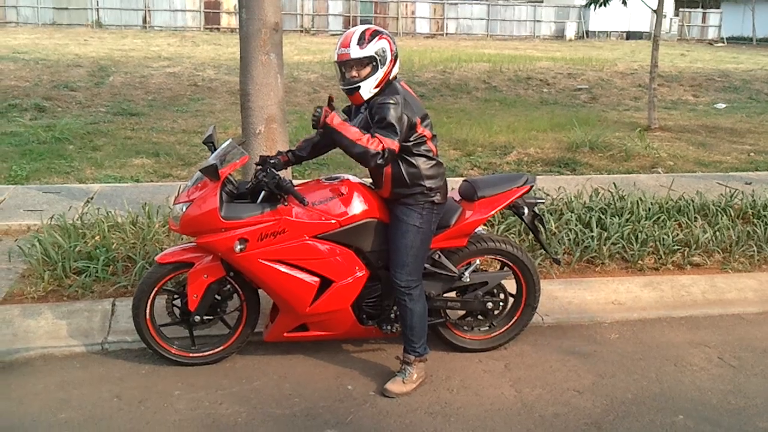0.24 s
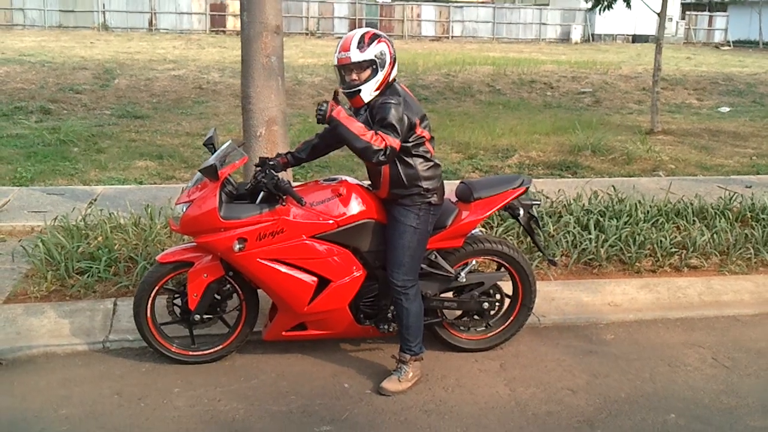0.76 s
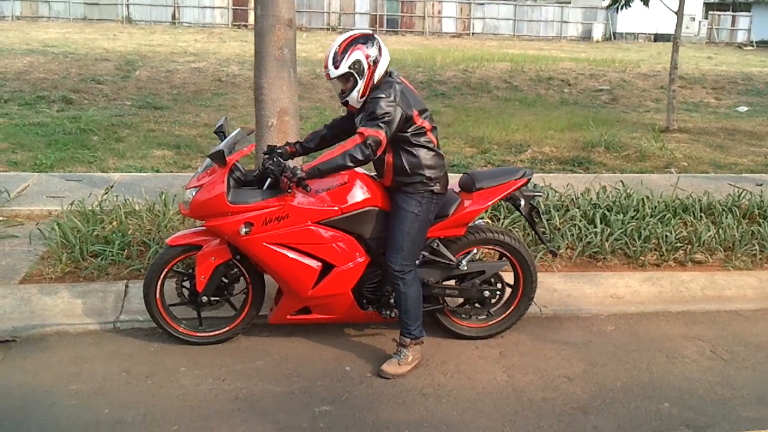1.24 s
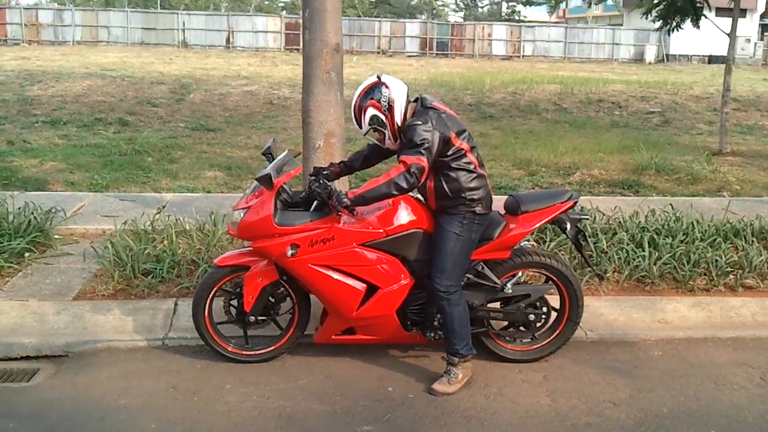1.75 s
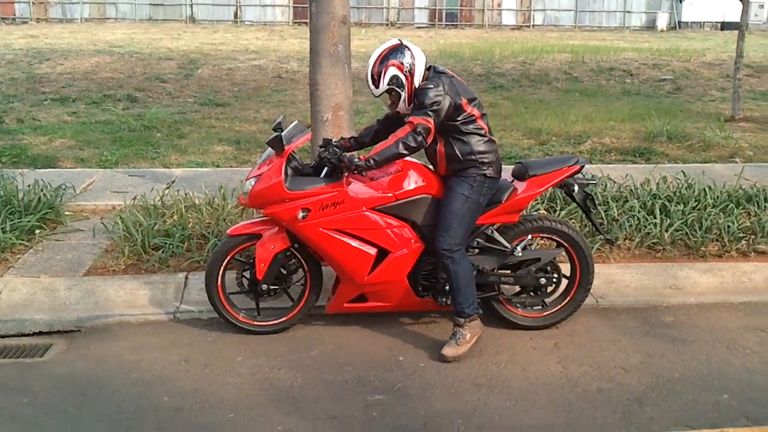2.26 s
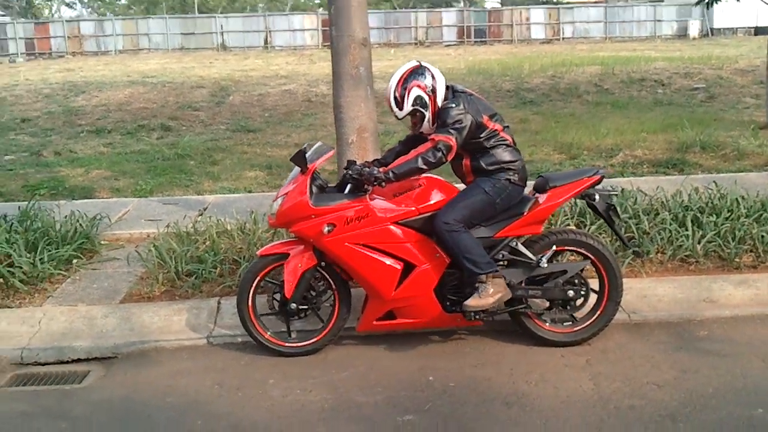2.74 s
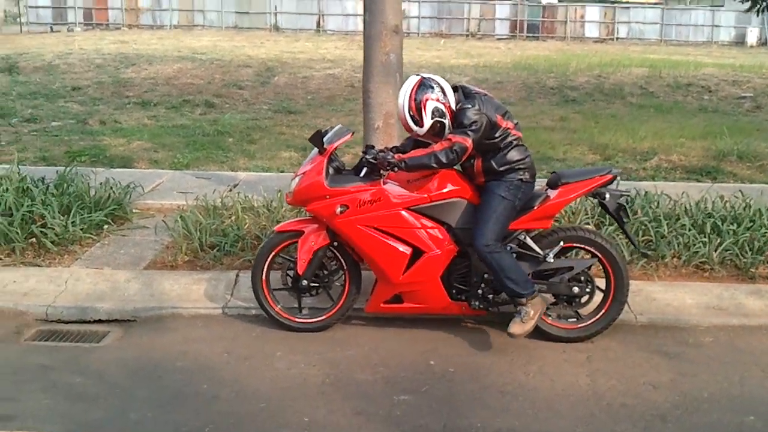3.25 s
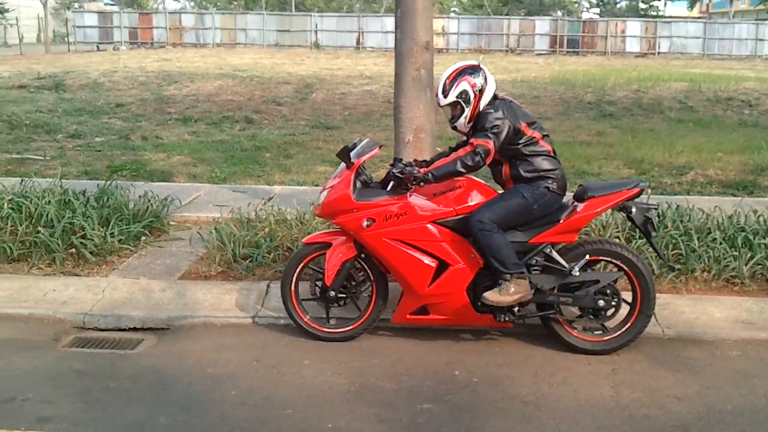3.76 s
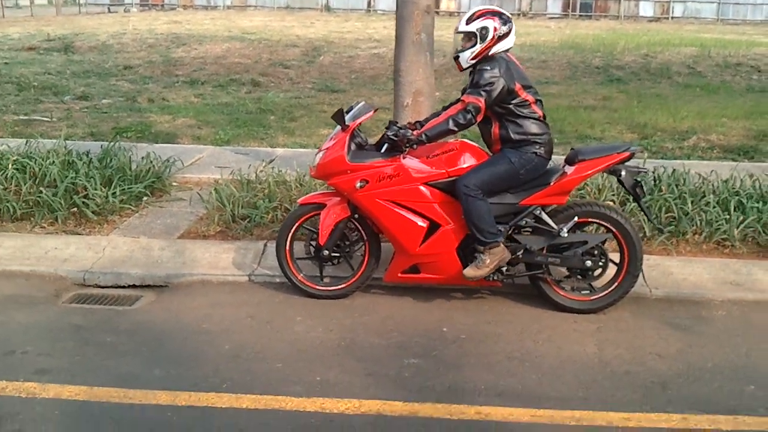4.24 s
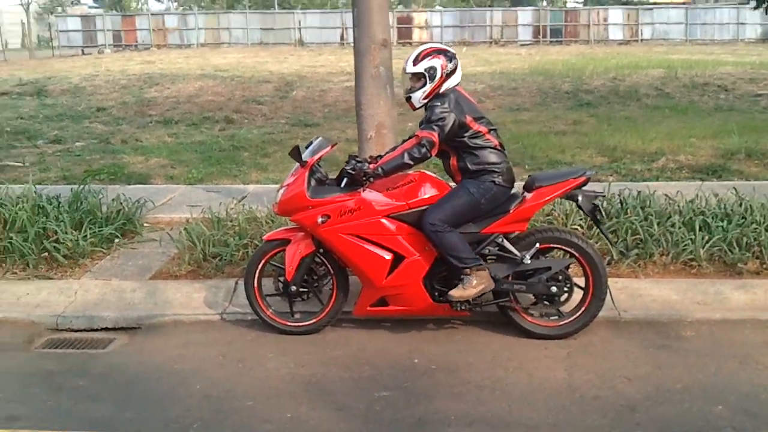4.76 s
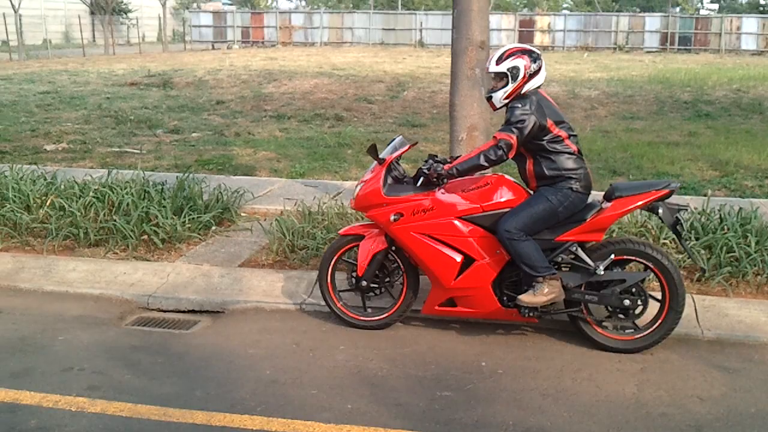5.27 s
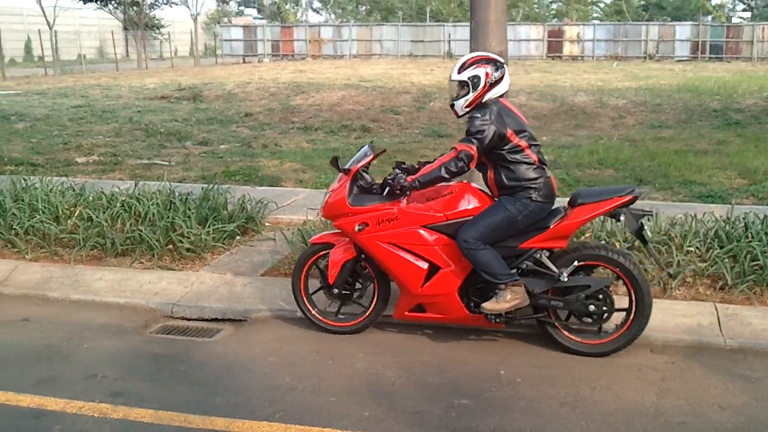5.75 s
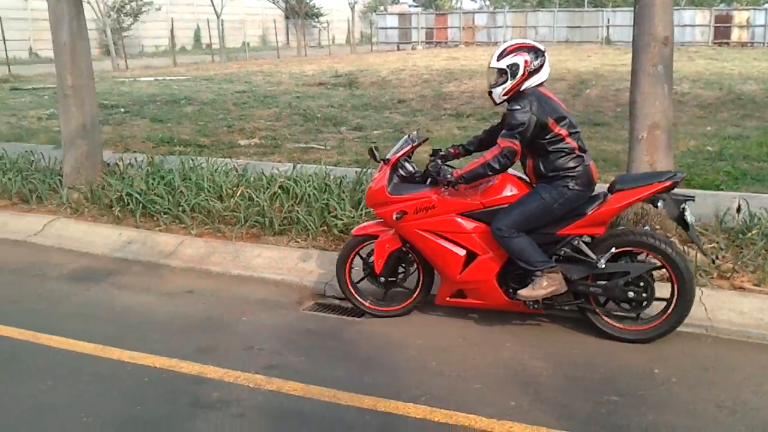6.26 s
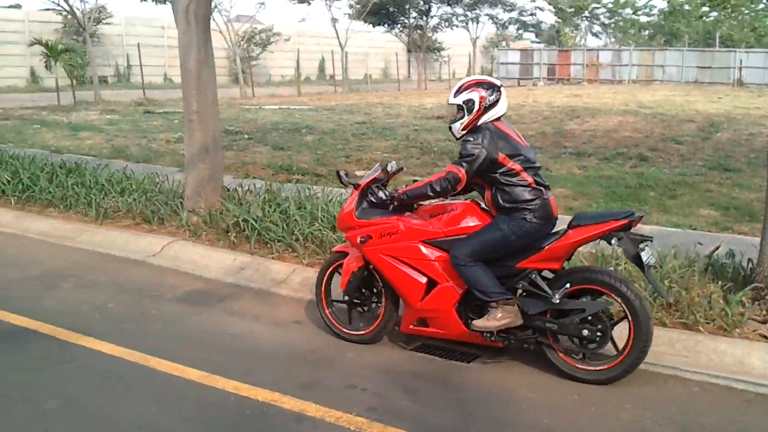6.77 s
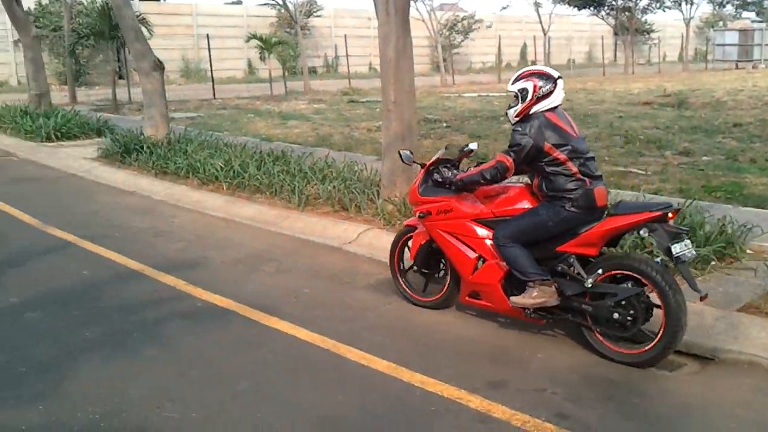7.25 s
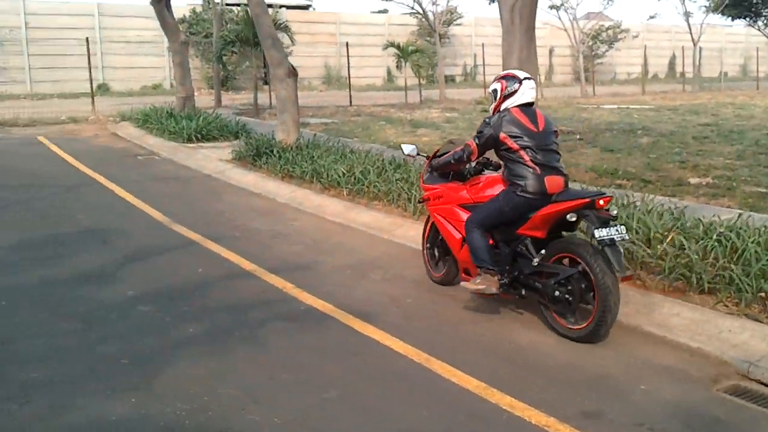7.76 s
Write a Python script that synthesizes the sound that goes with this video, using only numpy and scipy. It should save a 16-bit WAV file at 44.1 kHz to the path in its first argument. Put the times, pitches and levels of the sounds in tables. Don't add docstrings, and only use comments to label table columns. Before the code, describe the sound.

Motorbike idling at the kerb, revved three times with bright lever clicks, then gear whine and rising engine drone as it rides off in gusts.

```python
import sys
import numpy as np
from scipy import signal
from scipy.fft import rfft, irfft
from scipy.io import wavfile
from scipy.ndimage import uniform_filter1d

SR = 44100
rng = np.random.default_rng(int(sys.argv[2]) if len(sys.argv) > 2 else 0)


def rack_gain(trim_db):
    fader = np.asarray(trim_db, float)
    return 10 ** (fader / 20)


def bounce(signal):
    frames = np.transpose(np.atleast_2d(signal))
    limited = np.clip(frames, -1, 1)
    pcm = np.round(limited * 32767).astype(np.int16)
    wavfile.write(sys.argv[1], SR, pcm)


N = 353241
TIME = np.arange(N) / SR


def rms_one(x):
    return x / np.sqrt(np.mean(x ** 2) + 1e-20)


def in_time(rows):
    return np.interp(TIME, *np.transpose(rows))


def high_pass(order, hz):
    return signal.butter(order, hz, "high", fs=SR, output="sos")


def band(x, low_hz, high_hz):
    return signal.sosfilt(signal.butter(2, [low_hz, high_hz], "band", fs=SR, output="sos"), x)


def resonance(x, hz, width_hz):
    r = np.exp(-np.pi * width_hz / SR)
    poles = [1, -2 * r * np.cos(2 * np.pi * hz / SR), r * r]
    return signal.lfilter([(1 - r * r) / 2, 0, (r * r - 1) / 2], poles, x + 1e-18)


def body(x, modes):
    return sum(rack_gain(db) * resonance(x, hz, width_hz) for hz, width_hz, db in modes)


def coloured(x, points):
    hz, db = np.transpose(points)
    grid_hz = np.arange(N // 2 + 1) * SR / N + 1
    gain_db = np.interp(np.log(grid_hz), np.log(hz), db)
    return rms_one(irfft(rfft(x) * rack_gain(gain_db), N))


def drift(rate_hz):
    r = np.exp(-2 * np.pi * rate_hz / SR)
    wander = signal.lfilter([1], [1, -2 * r, r * r], rng.standard_normal(N + SR))
    return rms_one(wander[SR:])


def levelled(x, window_s):
    power = uniform_filter1d(x ** 2, int(window_s * SR), mode="reflect")
    return x / np.sqrt(power + 1e-12)


def crank_speed():
    # time in seconds, speed in cycles per second before the rounding.
    speed_points = [(0.0, 9.28), (1.63, 9.11), (2.05, 27.41), (2.44, 20.67), (2.56, 27.35), (2.8, 25.41),
                    (3.44, 9.42), (3.94, 15.51), (4.17, 27.47), (4.76, 11.23), (4.98, 19.17), (5.38, 30.21),
                    (6.05, 25.42), (6.78, 24.25), (7.16, 28.76), (7.3, 29.93), (7.71, 21.13), (8.01, 20.87)]
    flywheel = int(.125 * SR)
    once = uniform_filter1d(in_time(speed_points), flywheel, mode="nearest")
    return uniform_filter1d(once, flywheel, mode="nearest")


def throttle():
    # opens in seconds, shuts in seconds, opening 0-1, time to open in seconds.
    twists = [
        (1.614, 2.023, 0.99, .12),
        (2.416, 2.59, 0.79, 0.014),
        (3.67, 3.84, 0, .06),
        (3.832, 4.125, 0.94, 0.067),
        (4.778, 5.047, 0.74, 0.069),
        (5.107, 7.357, 0.68, 0.093),
        (7.748, 8.2, 0.49, .08),
    ]
    shut_s = .1
    openings = []
    for opens, shuts, share, rise_s in twists:
        opened = 1 - np.exp(-np.maximum(TIME - opens, 0) / rise_s)
        openings.append(share * opened * np.exp(-np.maximum(TIME - shuts, 0) / shut_s))
    return np.max(openings, axis=0)


def in_gear():
    return np.clip((TIME - 5.2) * 8, 0, 1)


def firings(cycles, scatter_db, second_db):
    kicks = np.zeros(N)
    for lag_cycles, level_db in ((0, 0), (.243, second_db)):
        at = np.flatnonzero(np.diff(np.floor(cycles - lag_cycles)) > 0)
        kicks[at] = rack_gain(level_db + scatter_db * rng.standard_normal(len(at)))
    return kicks


def puffs(kicks, decay_s):
    envelope = signal.lfilter([1], [1, -np.exp(-1 / (decay_s * SR))], kicks)
    return envelope * rng.standard_normal(N)


def doublets(kicks, width_s):
    t = np.arange(-400, 401) / SR / width_s - .6
    pulse = (t - .55 * (1 - t ** 2)) * np.exp(-t ** 2 / 2)
    return signal.fftconvolve(kicks, pulse, "same")


def exhaust(cycles, speed):
    # chamber resonance in Hz, width in Hz, level in dB.
    silencer = [(75, 22, 1), (105, 30, -3), (152, 28, 0), (225, 40, -8), (320, 80, -9), (425, 60, -3)]
    loaded = in_gear()
    kicks = firings(cycles, scatter_db=1.8, second_db=2.0)
    clean = levelled(body(doublets(kicks, width_s=.0013), silencer), .3)
    turbulence = band(band(puffs(kicks, .12), 55, 500), 45, 560)
    blur = levelled(body(turbulence, silencer), .3)
    blur_share = np.interp(speed, [10, 18], [1, .8]) * (1 - .6 * loaded)
    gas = (clean + blur_share * blur) / np.sqrt(1 + blur_share ** 2)
    thin = band(gas, 85, 600)
    return (1 - loaded) * gas + rack_gain(-21) * loaded * thin


def casing(cycles):
    # cover resonance in Hz, width in Hz, level in dB.
    neutral_modes = [(872, 205, 4), (1344, 89, 0.5), (1613, 170, 1)]
    loaded_modes = [(995, 150, 3), (835, 260, 1.5), (1574, 460, -10)]
    knock = puffs(firings(cycles + .03, scatter_db=1.5, second_db=-3.0), .015)
    oil = .4 * rng.standard_normal(N)
    shaken = band(knock + oil, 872, 1650)
    loaded = in_gear()
    return levelled((1 - loaded) * body(shaken, neutral_modes) + loaded * body(shaken, loaded_modes), 0.48)


def clatter(cycles, speed):
    # frequency in Hz, level in dB per Hz.
    idle_spectrum = [(1060, -36), (1800, -21.5), (1930, -26), (2200, -14), (2600, -15), (2920, -6.5),
                     (3180, -11), (3740, -8), (3940, -12), (4320, -4.5), (4860, -11), (5610, -11),
                     (7430, -15), (7930, -8), (8580, -4), (11200, -66), (18900, -120)]
    fast_spectrum = [(1060, -18.5), (1800, -15), (2000, -21), (2370, -15), (2920, -12), (3180, -13.5),
                     (3820, -10.5), (4210, -4.5), (4550, -3), (5050, -10.5), (5760, -4.5), (6780, -11.5),
                     (7290, -9.5), (7980, -7), (8580, 1), (11200, -67.5), (18900, -120)]
    # share of the cycle after the first firing, swell in dB.
    valve_timing = [(0, -6), (.18, 1.5), (.27, -2), (.42, -3), (.53, -3.5), (.7, -2.5), (.85, -1), (1, 3.5)]
    sizes = rack_gain(0.83 * np.minimum(rng.exponential(1, N), 4)) * rng.choice([-1, 1], N)
    ticks = rms_one(sizes * (rng.random(N) < 120 * speed / SR))
    contacts = levelled(ticks, 0.024) + 1.53 * rng.standard_normal(N)
    fast = np.clip((speed - 10) / 5.4, 0, 1)
    timing_db = np.interp(cycles % 1, *np.transpose(valve_timing)) * (1 - 0.38 * fast)
    tone = (1 - fast) * coloured(contacts, idle_spectrum) + fast * coloured(contacts, fast_spectrum)
    return tone * rack_gain(timing_db + 0.76 * drift(37))


def shaded(x):
    held = np.clip(np.minimum(TIME - 3.17, 4.52 - TIME) * 5, 0, 1)
    shadow = np.clip((TIME - 4.9) * 0.14, 0, .8)
    x = x + 0.31 * in_gear() * resonance(x, 4400, 550)
    return rack_gain(-2 * held) * (x - shadow * resonance(x, 2710, 1400))


def wind():
    # peak in seconds, level in dB, swell in seconds, lull in seconds.
    gusts = [(.08, -44, 0.27, .2), (1.3, -43.5, 0.23, 0.23), (3.7, -39.5, 0.037, .25),
             (5.199, -27.5, 0.19, 0.028), (6.3, -36, 0.26, 0.15), (6.38, -25.5, 0.023, 0.018),
             (6.474, -34, 0.039, 0.031), (6.7, -31.5, 0.23, 0.095), (6.775, -30, 0.037, 0.033),
             (6.85, -35.5, .05, 0.21), (7.07, -31, 0.02, 0.064), (7.15, -40, 0.04, .4),
             (7.68, -34, 0.041, 0.11), (7.6, -45.5, 0.41, 2.3)]
    # time in seconds, peak in dB, pitch in Hz.
    thumps = [(0.079, -26, 198), (.165, -31, 200), (1.303, -26, 408), (5.156, -24, 200), (5.201, -15, 250),
              (6.243, -25, 200), (6.309, -22, 250), (6.379, -16, 300), (6.468, -18, 250),
              (6.589, -16.5, 370), (6.604, -21, 300), (6.617, -18, 201), (6.65, -15, 248),
              (6.746, -22, 283), (6.775, -14.5, 400), (6.856, -17, 400), (6.897, -15.5, 255),
              (7.071, -20.5, 456), (7.679, -20.5, 256), (7.745, -22.5, 400)]
    level = np.zeros(N)
    for s, db, swell_s, lull_s in gusts:
        away = np.maximum((s - TIME) / swell_s, (TIME - s) / lull_s)
        level += rack_gain(db - 18 * away ** 2)
    rumble = band(band(rng.standard_normal(N), 30, 330), 30, 800)
    out = level * rack_gain(3.0) * rms_one(rumble * rack_gain(3.0 * drift(40)))
    t = np.arange(-400, 400) / SR
    for s, db, hz in thumps:
        at = round(s * SR)
        out[at - 400:at + 400] -= rack_gain(db + 3) * np.sin(2 * np.pi * hz * t) * np.exp(-(t * hz * 1.9) ** 2)
    return out


def open_air():
    # frequency in Hz, level in dB.
    air_spectrum = [(40, -14), (80, 0), (200, -4), (500, -14), (1000, -18), (2000, -22), (4000, -20)]
    return rack_gain(-52) * coloured(rng.standard_normal(N), air_spectrum)


def intake(cycles):
    gulps = doublets(firings(cycles, scatter_db=1.2, second_db=-6.0), width_s=.00105)
    return levelled(signal.sosfiltfilt(high_pass(2, 82), gulps), 0.93)


def bark(cycles):
    # air box resonance in Hz, width in Hz, level in dB.
    air_box = [(480, 200, 0), (680, 200, -4), (995, 45, 7)]
    return levelled(body(firings(cycles, scatter_db=1.5, second_db=2.5), air_box), .3)


def hiss(cycles):
    puff = puffs(firings(cycles, scatter_db=1.5, second_db=-2.0), .01)
    return levelled(resonance(puff, 3040, 400), .3)


def clicks():
    # time in seconds, peak in dB, ring in Hz, rattle length in seconds, body share in dB.
    contacts = [(1.7218, -5, 5600, .0011, -40), (2.9524, -2.5, 5700, .0011, -40),
                (3.451, -20, 5300, .001, -25), (3.8214, 1.5, 6100, .0011, -17),
                (4.4975, -1, 5800, .0055, -9), (4.5332, -9, 6050, .0035, -18),
                (4.5652, -12, 4200, .002, -16), (4.58, -20, 5000, .012, -14), (4.66, -10, 5900, .007, -12),
                (4.753, -26, 4500, .004, -20), (4.7785, -13, 4900, .007, -20)]
    # gearbox resonance in Hz, width in Hz, level in dB.
    gearbox = [(452, 39, 2), (786, 290, -3), (1240, 220, -2), (2630, 310, -12)]
    out, t = np.zeros(N), np.arange(4000) / SR
    for s, db, hz, length_s, body_db in contacts:
        age = t / length_s
        shape = age ** .35 * np.exp(-age ** 1.2)
        shape = shape + rack_gain(-21) * np.minimum(age, 1) * np.exp(-age / 9.6)
        rattle = rng.standard_normal(len(t)) * shape
        ring = resonance(resonance(rattle, hz, 1300), hz, 2500)
        bright = ring + .25 * band(band(rattle, 4300, 9000), 3800, 9500)
        low, clank = body(rattle, gearbox), band(rattle, 900, 3000)
        low = low / abs(low).max() + rack_gain(-13) * clank / abs(clank).max()
        at = round(s * SR)
        out[at:at + len(t)] += rack_gain(db) * (bright / abs(bright).max() + rack_gain(body_db) * low)
    return out


def squeaks():
    # centre in seconds, level in dB, pitch in Hz, half length in seconds.
    whistles = [
        (3.035, -33, 1415, 0.023),
        (4.464, -35, 1378, 0.051),
    ]
    out = np.zeros(N)
    for s, db, hz, half_s in whistles:
        t = TIME - s
        out += rack_gain(db) * np.exp(-(t / half_s) ** 2) * np.sin(2 * np.pi * (hz - 600 * t) * t)
    return out


def gear_whine(cycles):
    # time in seconds, mesh tone under load in dB.
    load = [(4.8, -86), (4.93, -41), (5.22, -46.5), (5.47, -33), (5.88, -48.5), (6.5, -38), (7.11, -35.5),
            (7.22, -42), (8.01, -38)]
    # teeth met per cycle, level in dB (overtones: in gear, throttle shut).
    mesh = [(46, 0), (36, -17)]
    overtones = [(92, -53), (138, -50)]
    beat = 2 * np.pi * cycles
    loaded = in_gear()
    load_db = in_time(load) + 5
    partials = [(teeth, rack_gain(load_db + db)) for teeth, db in mesh]
    overtone_db = 11 * throttle()
    partials += [(teeth, rack_gain(db + overtone_db) * loaded) for teeth, db in overtones]
    tone = np.zeros(N)
    for teeth, level in partials:
        smear = (teeth / 46) ** 1.3 * .3 + 1.2 * (1 - loaded)
        wobble = .35 * np.sin(beat) + smear * drift(40)
        tone += level * rack_gain(1.5 * drift(30)) * np.sin(round(teeth) * beat + wobble)
    return rack_gain(2.5 * np.cos(beat - 2.2)) * tone


def scene():
    # dB at idle, dB per doubling of speed, dB at full throttle, dB once in gear.
    exhaust_law = (-39.5, 1, 0.5, 20.5)
    casing_law = (-44.5, -0.04, 10, -5)
    clatter_law = (-36, 7, 3, -1.5)
    intake_law = (-51, 2, 15.5, 1)
    bark_law = (-62, 1.5, 8, 9)
    hiss_law = (-57, -0.5, 20.5, -20)
    speed = crank_speed()
    cycles = -.305 + np.cumsum(speed) / SR
    idle_speed = 9.3
    drive = np.array([np.ones(N), np.log2(speed / idle_speed), throttle(), in_gear()])
    engine = rack_gain(exhaust_law @ drive) * exhaust(cycles, speed)
    engine += rack_gain(casing_law @ drive) * casing(cycles)
    engine += rack_gain(clatter_law @ drive) * shaded(clatter(cycles, speed))
    engine += rack_gain(intake_law @ drive) * intake(cycles)
    engine -= rack_gain(bark_law @ drive) * bark(cycles)
    engine += rack_gain(hiss_law @ drive) * hiss(cycles)
    engine += gear_whine(cycles)
    return (engine + wind() + open_air() + clicks() + squeaks())[None]


def band_limit(x):
    return signal.sosfilt(signal.butter(12, 16600, fs=SR, output="sos"), x)


def record(dry):
    x = signal.sosfilt(high_pass(2, 68), dry)
    tripped = np.clip(np.minimum(TIME - 5.23, 6.22 - TIME) * 50, 0, 1)
    x = x + 0.46 * tripped * (signal.sosfiltfilt(high_pass(3, 80), x) - x)
    x = signal.sosfilt(signal.cheby2(12, 90, 9905, fs=SR, output="sos"), x)
    overload = .76
    return band_limit(np.clip(x, -overload, overload))


dry = scene()
out = record(dry)
bounce(out)
```